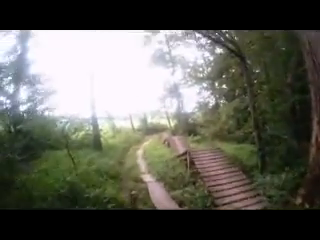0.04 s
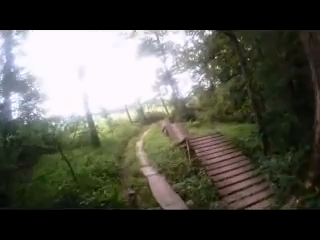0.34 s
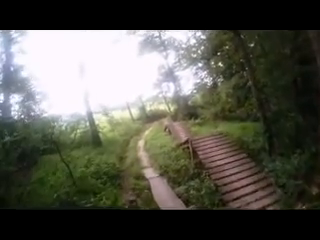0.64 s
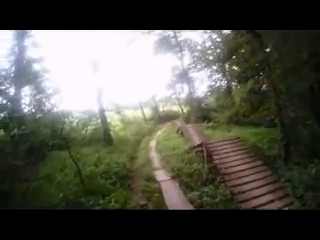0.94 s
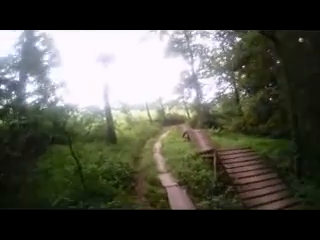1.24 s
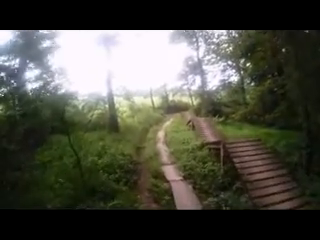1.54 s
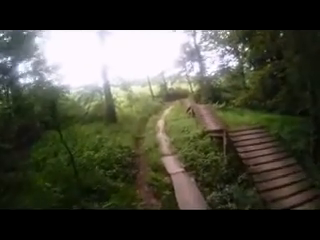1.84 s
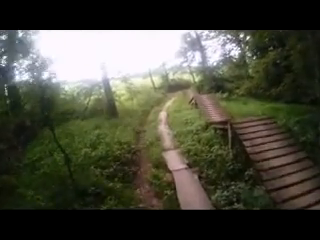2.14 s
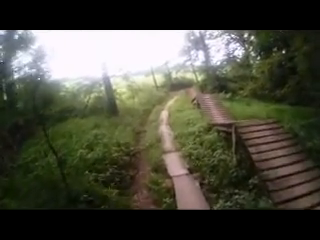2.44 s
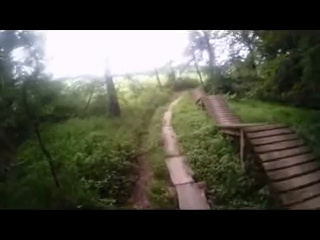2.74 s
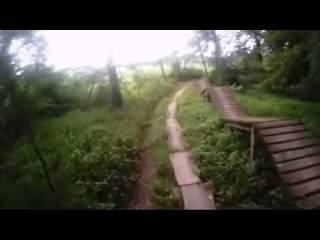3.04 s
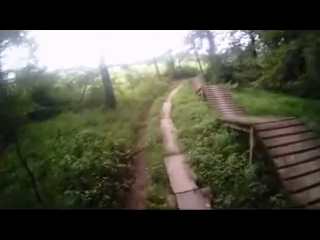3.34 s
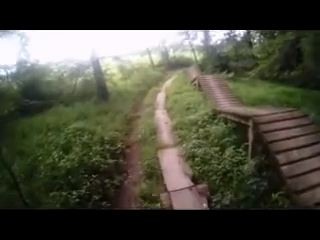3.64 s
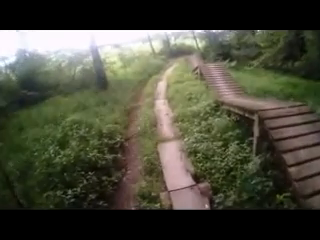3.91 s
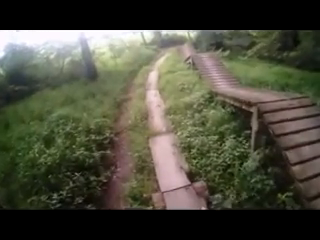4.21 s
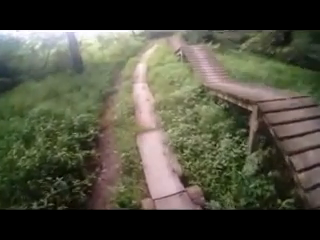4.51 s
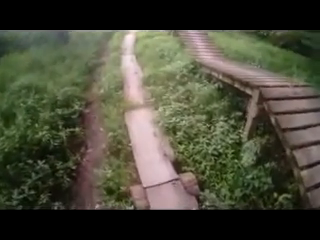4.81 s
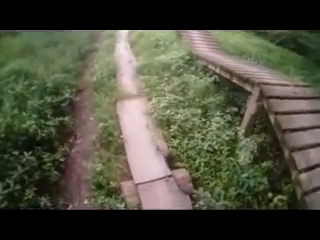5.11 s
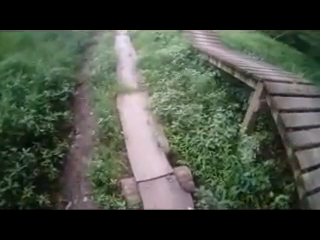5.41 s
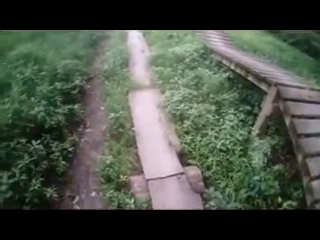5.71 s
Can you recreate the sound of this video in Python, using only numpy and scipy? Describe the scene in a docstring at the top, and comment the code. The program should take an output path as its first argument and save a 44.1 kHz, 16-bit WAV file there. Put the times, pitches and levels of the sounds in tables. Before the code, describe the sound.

A camera worn along a forest trail is jostled, heard very close through its own case. Dull thumps lead into a loud burst of hollow plastic knocks and rough rustling scrapes that lasts over a second. The handling eases, returns briefly with a weaker scuff and clatter, and dies away to scattered light bumps. A faint steady hiss and low rumble lie underneath.

```python
"""The plastic case of a body-worn camera knocks and chatters in its mount as it is bumped and shifted.
Impacts and the stick-slip friction of fingers and fabric excite the modes of the case, and its walls
filter every touch. The camera's mass bounces on the mount in soft thumps, and slow sway reaches the
microphone as rumble, over a faint steady hiss."""
import sys
import numpy as np
from scipy import signal
from scipy.fft import rfft, irfft
from scipy.io import wavfile
from scipy.ndimage import uniform_filter1d

SR = 44100
rng = np.random.default_rng(int(sys.argv[2]) if len(sys.argv) > 2 else 0)


def persist_wave(psi):
    """Save psi, clipped to +-1, as 16-bit WAV."""
    counts = np.round(np.clip(psi, -1, 1) * 32767).astype(np.int16)
    wavfile.write(sys.argv[1], SR, np.atleast_2d(counts).T)


N = 262836


def gain_of(db):
    """Amplitude ratio of a level in decibels."""
    return 10 ** (np.asarray(db) / 20)


def unit_rms(x):
    """Normalisation to unit mean power."""
    return x / np.sqrt(np.mean(x ** 2) + 1e-20)


def gain_at(spectrum, hz):
    """Amplitude response, by interpolating levels on a log-frequency axis."""
    f, db = np.transpose(spectrum)
    return gain_of(np.interp(np.log(hz + 1), np.log(f + 1), db))


def add(mix, start_s, sound):
    """Superposition of a sound on the mix."""
    part = mix[round(start_s * SR):][:len(sound)]
    part += sound[:len(part)]


def noise(spectrum):
    """Spectral shaping of white noise, at unit rms."""
    colour = gain_at(spectrum, np.fft.rfftfreq(N, 1 / SR))
    return unit_rms(irfft(rfft(rng.standard_normal(N)) * colour, N))


def flutter(rate_hz, depth_db, size=N, ceiling=2):
    """Random amplitude modulation: a gain whose level follows clipped low-pass noise."""
    lowpass = np.exp(-(np.fft.rfftfreq(size, 1 / SR) / rate_hz) ** 2)
    drift = unit_rms(irfft(rfft(rng.standard_normal(size)) * lowpass, size))
    return gain_of(depth_db * np.clip(drift, -2, ceiling))


# Noise floor of the microphone: (frequency [Hz], relative spectral density [dB])
HISS_SPECTRUM = [(53, -34.5), (90, -1.5), (128, -0.5), (203, -2.5), (304, -5), (439, -7), (590, -7.5),
                 (635, -10), (684, -8), (1480, -10.5), (1630, -9), (1880, -11.5), (4240, -14), (6130, -25),
                 (7370, -36.5), (9580, -51), (16200, -120)]


def hiss(level_db=-59):
    """Self-noise: the microphone adds a stationary random signal."""
    return gain_of(level_db) * noise(HISS_SPECTRUM)


# The hand's hold on the case: (time [s], pressure level [dB], drag level [dB])
HAND_FORCES = [(1.24, -69, -42), (1.3, -48.5, -40), (1.42, -30, -39.5), (1.66, -51, -39),
               (1.84, -40.5, -43.5), (2.0, -30.5, -35), (2.12, -35, -33.5), (2.36, -34.5, -34),
               (2.44, -38.5, -34.5), (2.6, -45.5, -54.5), (2.88, -75, -52.5), (3.01, -50.5, -53),
               (3.2, -53, -43), (3.33, -51, -46.5), (3.47, -67, -55), (3.74, -65, -71), (3.98, -54, -64.5),
               (4.3, -64, -67)]


def hand_forces():
    """Normal and tangential force, as amplitudes: both vanish while the hand is off the case."""
    times, pressure_db, drag_db = np.transpose(HAND_FORCES)
    t = np.arange(N) / SR
    return [gain_of(np.interp(t, times, db, left=-200, right=-200)) for db in (pressure_db, drag_db)]


# Air pressure in the swaying case: (frequency [Hz], relative spectral density [dB])
SWAY_SPECTRUM = [(4, -1.5), (12, 8), (22, -1.5), (35, -8.5), (55, -12.5), (75, -24), (110, -35), (200, -51),
                 (400, -83.5)]


def rumble(rest_db=-40.5, smoothing_s=0.3):
    """Cavity compression: sway squeezes the air in the case, more so while the hand drags at it."""
    _, drag = hand_forces()
    slow_drag = uniform_filter1d(drag, round(smoothing_s * SR))
    return noise(SWAY_SPECTRUM) * (gain_of(rest_db) + slow_drag)


# Bounces of the camera on its mount (below 65 Hz) and brief shudders of the case shell (190-460 Hz): (time [s],
# envelope peak [dB], frequency [Hz])
BOUNCES_AND_SHUDDERS = [(1.014, -9.5, 43.8), (1.051, -13, 39.2), (1.257, -23, 54), (1.324, -17.5, 48),
                        (1.746, -25, 460), (2.101, -15, 56.6), (2.271, -21, 396), (2.299, -25, 191),
                        (2.466, -24, 383), (2.562, -28.5, 53), (3.343, -24.5, 62.7), (3.346, -25.5, 234),
                        (3.437, -24.5, 210), (4.378, -33.5, 31.4), (4.881, -32, 33), (5.182, -34.5, 51.7),
                        (5.756, -29.5, 42.7)]


def thumps(reference_hz=51, reference_swell_s=0.017, size=14000):
    """Damped oscillation: the camera bounces on its mount for a few cycles, and the case shell shudders briefly
    at its own modes."""
    out, t = np.zeros(N), np.arange(size) / SR
    for start, db, hz in BOUNCES_AND_SHUDDERS:
        swell = reference_swell_s * (reference_hz / hz) ** 0.34  # higher thumps swell and die sooner
        envelope = (t / swell * np.exp(1 - t / swell)) ** 2
        add(out, start, gain_of(db) * envelope * np.sin(2 * np.pi * hz * t))
    return out


# Resonances of the case: (frequency [Hz], nominal bandwidth [Hz], level [dB])
CASE_MODES = [(210, 100, -0.5), (427, 140, -4), (547, 150, -7.5), (916, 150, -12), (1084, 120, 1),
              (1100, 70, -20), (1540, 770, -19), (2050, 310, -12), (2550, 240, -14), (2803, 78, -4),
              (3010, 250, -10), (3395, 140, -14.5), (4220, 260, -12.5), (4320, 310, -11), (4770, 340, -17),
              (4820, 190, -22.5), (6190, 350, -27), (6700, 81, -20.5)]
# Transmission through the walls to the microphone: (frequency [Hz], gain [dB])
WALL_TRANSMISSION = [(40, -12.5), (110, 1.5), (200, 2), (300, -1.5), (430, 3), (760, 3.5), (1050, 2),
                     (3400, -9.5), (3680, -8.5), (4100, -11.5), (4800, -15), (5300, -11.5), (6800, -11.5),
                     (7400, -10)]
# Borders between flexing shell (bass), hollow inside, stiff walls (upper mid) and edges (treble):
# (frequency [Hz])
CROSSOVERS = (760, 1480, 3700)


def case_response(force_db, bass_db, upper_mid_db, treble_db, spot_db=4.5, detune=0.008, size=4096):
    """Modal impulse response: the point of contact favours some modes and detunes them a little."""
    hz = np.fft.rfftfreq(size, 1 / SR)
    damping = gain_of(0.14 * (force_db + 36))  # a hard press broadens the modes
    power = np.zeros(len(hz))
    for centre, width, db in CASE_MODES:
        favour, shift = rng.standard_normal(2)
        offset = 2 * (hz - centre * (1 + detune * shift)) / (width * damping)
        power += gain_of(db + spot_db * favour) ** 2 / (1 + offset ** 2) ** 1.51
    power *= gain_at(WALL_TRANSMISSION, hz) ** 2
    lowpasses = [1 / (1 + (hz / f) ** 12) for f in CROSSOVERS]
    bands = power * np.diff(lowpasses, axis=0, prepend=0, append=1)
    levels = gain_of([bass_db, 0, upper_mid_db, treble_db])
    gain = np.sqrt(sum(level ** 2 * band / np.mean(band) for level, band in zip(levels, bands)))
    log_gain = np.log(np.r_[gain, gain[-2:0:-1]] + 1e-4)
    minimum_phase = np.exp(np.conj(signal.hilbert(log_gain)))  # causal: nothing before the tap
    return np.fft.ifft(minimum_phase).real[:size // 2]


def friction(slips_per_s, size, spread_db, smooth):
    """Stick-slip friction: clumps of tiny uneven clicks over a smooth rub."""
    strengths = gain_of(spread_db * np.minimum(rng.exponential(1, size), 3))
    signs = rng.choice([-1, 1], size)
    slips = unit_rms(strengths * signs * (rng.random(size) < slips_per_s / SR))
    force = slips + smooth * rng.standard_normal(size)
    return unit_rms(force * flutter(rate_hz=60, depth_db=4, size=size, ceiling=1))


def grip(rub_db=-5, tug_db=1, tone_db=(-2, -5, -10), variety_db=3, spots=5):
    """Frictional creep: skin scuffs several spots of the case, and its drag tugs at the shell."""
    pressure, drag = hand_forces()
    scuffs = unit_rms(flutter(rate_hz=55, depth_db=4))
    rub = np.zeros(N)
    for bass, upper_mid, treble in rng.uniform(-variety_db, variety_db, (spots, 3)) + tone_db:
        share = unit_rms(flutter(rate_hz=22, depth_db=4)) / np.sqrt(spots)
        ring = case_response(force_db=-42, bass_db=bass, upper_mid_db=upper_mid, treble_db=treble)
        slips = friction(slips_per_s=500, size=N, spread_db=4.5, smooth=0.12)
        rub += signal.oaconvolve(slips * share * scuffs * pressure, ring)[:N]
    # (frequency [Hz], relative spectral density [dB])
    tug = noise([(15, -7), (55, 5), (90, 3), (140, -3), (205, 0.5), (290, -11), (500, -27), (1000, -65)])
    return gain_of(rub_db) * rub + gain_of(tug_db) * tug * drag


# Strokes of fingers and fabric:
# (time [s], duration [s], level [dB], bass [dB], upper mid [dB], treble [dB])
SCRAPE_STROKES = [(0.971, 0.13, -55.5, -5.5, -9.5, -22), (1.243, 0.096, -30.5, -2.5, -3, -9),
                  (1.353, 0.052, -36.5, 0.5, -7, -9.5), (1.402, 0.046, -29.5, -8, -4, -14),
                  (1.46, 0.029, -33, -1.5, 0.5, -3), (1.614, 0.091, -42, .5, -6, -13),
                  (1.655, 0.056, -48.5, 4.5, -27, -36), (1.723, 0.018, -41.5, 1, -4.5, -7),
                  (1.847, 0.012, -32.5, -8, -9, -26), (1.932, 0.048, -29.5, 0, -8, -10.5),
                  (2.042, 0.05, -39, 5.5, 1.5, -1.5), (2.106, 0.12, -46, 3, 1, -15),
                  (2.257, 0.033, -35, 2.5, 3, 1.5), (2.336, 0.12, -38.5, 1, 0, -6),
                  (2.46, 0.038, -44, 14.5, -1, -41), (2.5, 0.052, -39, 5.5, 0.5, -15),
                  (2.577, 0.019, -45, 11, 3, -13), (2.992, 0.077, -49, -1, -9, -30.5),
                  (3.168, 0.099, -51, 4.5, -3, -27), (3.356, 0.079, -40.5, -3, -3, -20.5),
                  (3.823, 0.029, -44.5, -6, -9, -34), (4.041, 0.094, -56, 1.5, 3.5, -7)]


def scrapes(bite_s=0.003, release_s=0.0075, size=8192):
    """Forced vibration by sliding friction: each stroke bites, drags over the case and lets go."""
    out, t = np.zeros(N), np.arange(size) / SR
    for start, duration, db, *tone_db in SCRAPE_STROKES:
        contact = (1 - np.exp(-t / bite_s)) * np.exp(-np.maximum(t - duration, 0) / release_s)
        force = gain_of(db) * contact * friction(slips_per_s=1500, size=size, spread_db=4, smooth=0.43)
        add(out, start, signal.fftconvolve(force, case_response(db, *tone_db)))
    return out


# Impacts of the case in its mount:
# (time [s], relative level [dB], bass [dB], upper mid [dB], treble [dB], chatter decay time [s])
CASE_IMPACTS = [(1.026, -40.5, -4.5, 1.5, -24.5, 0.0045), (1.056, -43, -13, -18, -5, .007),
                (1.2494, -6, -4, -9.5, -14, 0.009), (1.259, -22, 2, 7, -7, .006),
                (1.269, -18, 4, -8, -10, 0.0065), (1.279, -4.5, -5, -4.5, -2.5, 0.0061),
                (1.303, -9, -11, -13, -27, 0.0017), (1.3129, -10, -7, -1.5, -7.5, 0.0045),
                (1.374, -18, 1, -24, -15, 0.0017), (1.405, -19, -8.5, -9, -24, .0034),
                (1.4286, -12.5, -8, -1, -9, 0.0019), (1.467, -21.5, -8, 6.5, 2, 0.0018),
                (1.485, -20.5, -11.5, -4, -25, 0.0052), (1.5222, -30, -9, -3, -10.5, 0.027),
                (1.568, -25, -13, -11, -14, .0025), (1.705, -38.5, 10, -6, -11, 0.003),
                (1.749, -23.5, 5, -4, -24, 0.0066), (1.864, -22, -7, -10, -23, .003),
                (1.8724, -26, 2.5, 6.5, -8, 0.0012), (1.8959, -27.5, -10, 10.5, -2, 0.0012),
                (1.9299, -14.5, 0.5, 3.5, -3, 0.0016), (1.956, -17.5, 0.5, -3, -20, 0.0091),
                (2.114, -21.5, 4, -12, -23, 0.0026), (2.136, -21.5, -7, -26, -29, 0.0023),
                (2.166, -13.5, 1.5, 0, -8.5, 0.0097), (2.334, -34.5, 4.5, 12, -5, 0.0048),
                (2.425, -23, -0.5, -0.5, -15.5, 0.0085), (2.4555, -30, -13, 4, -7, 0.0015),
                (2.462, -21, -11, -25, -32, 0.0018), (2.496, -34.5, -4, 10.5, 10, 0.0047),
                (2.558, -36.5, 12.5, 11.5, 0, 0.0091), (2.854, -50, 7.5, 10, -13, 0.0041),
                (3.195, -49.5, 10.5, 0, -20, 0.0052), (3.347, -32, 8, -4, -24, .01),
                (3.435, -28, -4.5, 3.5, -13, 0.0065), (3.445, -24, -10, -2, -15, 0.0085),
                (3.499, -43.5, 0.5, -3, 0, 0.014), (3.642, -57, 13, -1, -18, 0.0073),
                (3.889, -46, 10, -23.5, -35, 0.0032), (4.154, -43, 1.5, -21.5, -29.5, .003),
                (4.181, -51, 11, -17, -23.5, 0.0094), (5.164, -36, -16, -9.5, -21.5, 0.011),
                (5.189, -38.5, -21.5, -23, -31, 0.0053), (5.738, -50.5, -10, -21, -28.5, 0.0046)]


def knocks(level_db=-4.5, seat_s=0.00016, graze_db=-15, graze_s=0.0011, size=3600):
    """Impact excitation: the parts graze, collide and chatter as they settle, ringing the case."""
    out, t = np.zeros(N), np.arange(-size // 8, size) / SR
    for contact_s, db, bass, upper_mid, treble, settle_s in CASE_IMPACTS:
        graze = gain_of(graze_db) * np.exp(-abs(t) / graze_s)
        chatter = (1 - np.exp(-abs(t) / seat_s)) * np.exp(-abs(t) / settle_s)
        force = rng.standard_normal(len(t)) * np.where(t < 0, graze, chatter)
        force[t == 0] += 4  # the collision itself
        ring = case_response(db, bass, upper_mid, treble)
        knock = signal.fftconvolve(force, ring)
        peak_rms = np.sqrt(uniform_filter1d(knock ** 2, 130).max())  # loudest 3 ms
        add(out, contact_s + t[0], gain_of(db + level_db) * np.linalg.norm(ring) * knock / peak_rms)
    return out


def scene():
    """Linear superposition of the contact sounds and the background, in one channel."""
    return (knocks() + scrapes() + grip() + thumps() + rumble() + hiss())[None]


def record(dry, mic_cutoff_hz=7600, output_cutoff_hz=16000):
    """Band limiting and saturation: a narrow-band microphone rounds off peaks near full scale."""
    mic_filter = signal.firwin(141, mic_cutoff_hz, window=("kaiser", 8), fs=SR)
    output_filter = signal.firwin(255, output_cutoff_hz, window=("kaiser", 9), fs=SR)
    heard = signal.oaconvolve(dry, mic_filter[None], "same")
    limited = heard / (1 + heard ** 14) ** (1 / 14)  # narrow knee
    return signal.oaconvolve(limited, output_filter[None], "same")


dry = scene()
out = record(dry)
persist_wave(out)
```